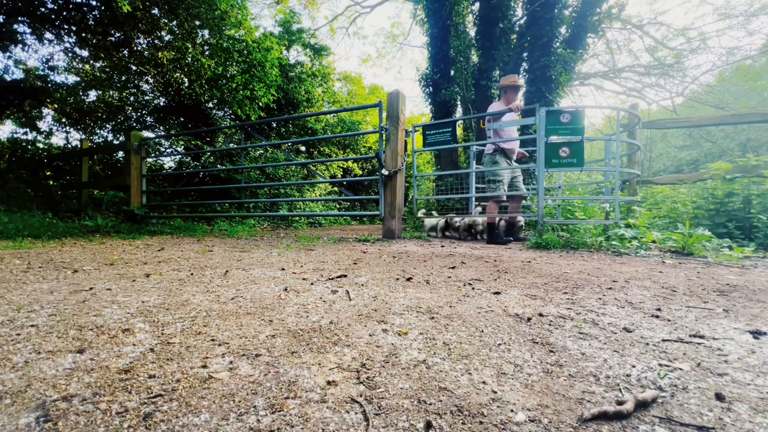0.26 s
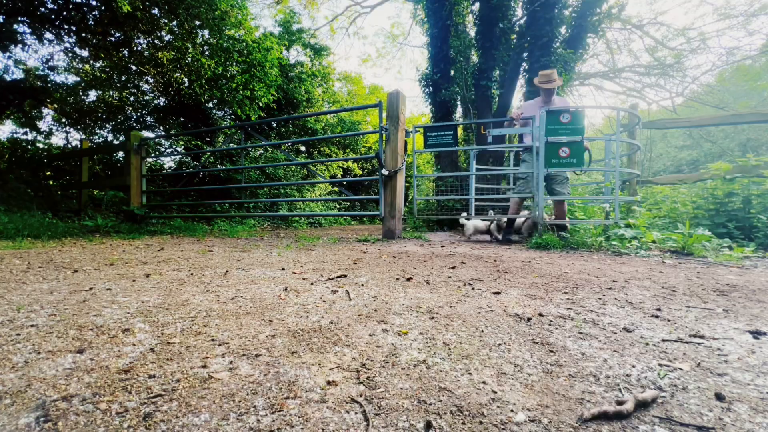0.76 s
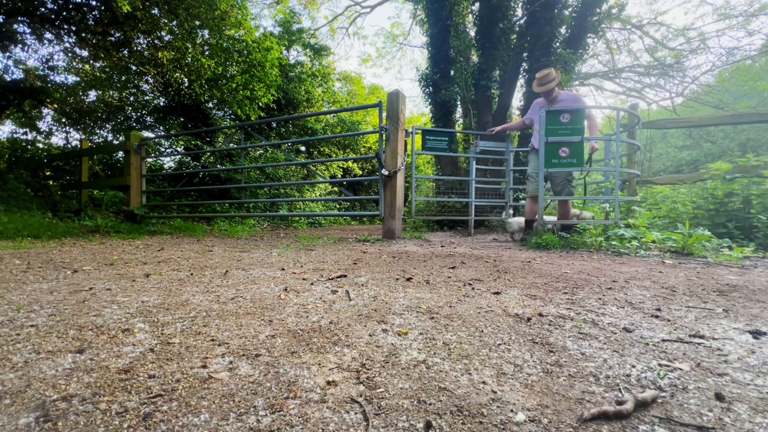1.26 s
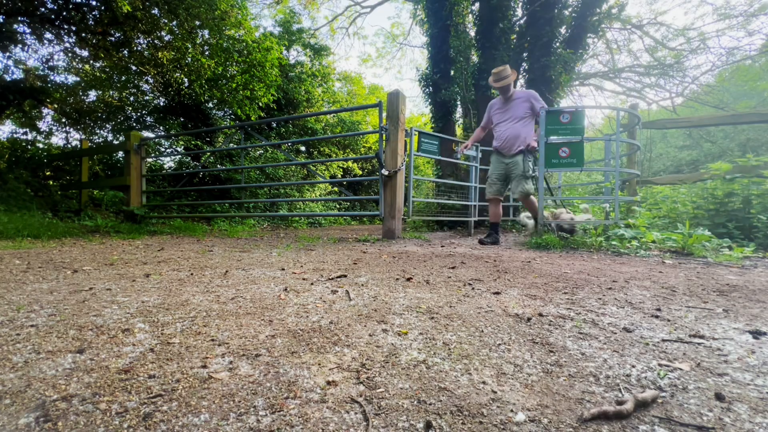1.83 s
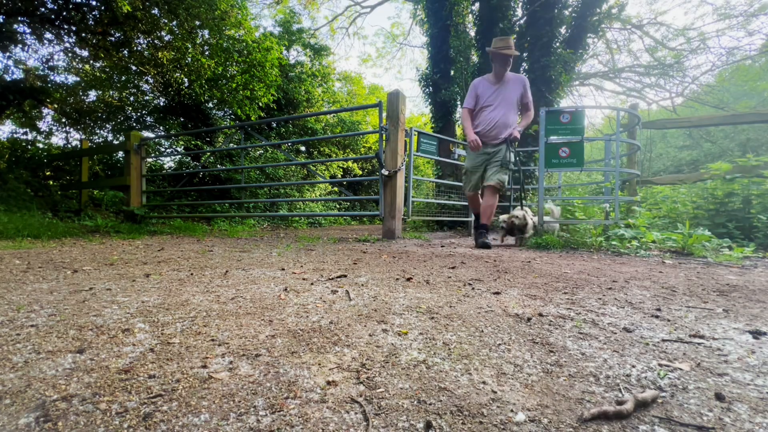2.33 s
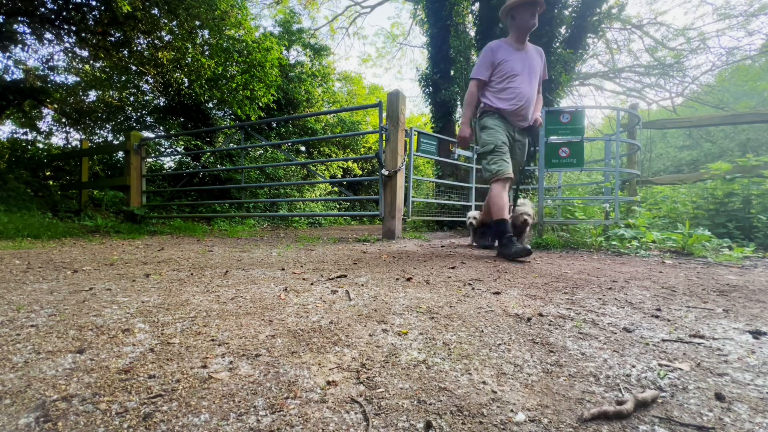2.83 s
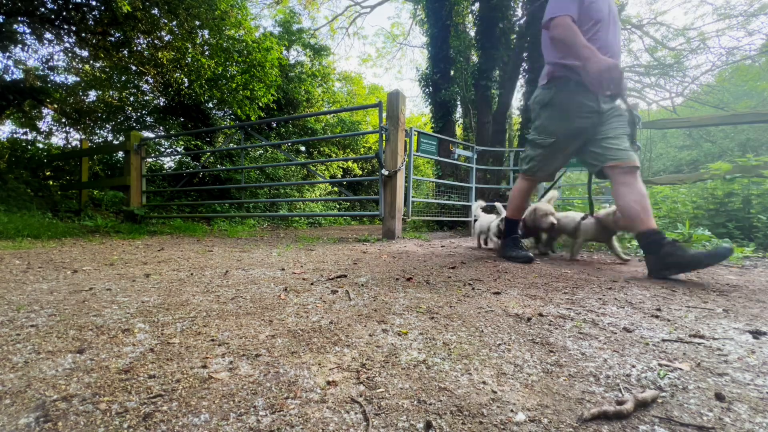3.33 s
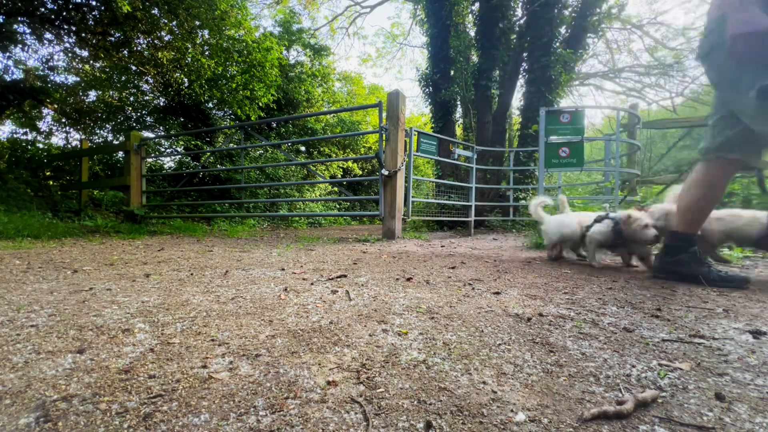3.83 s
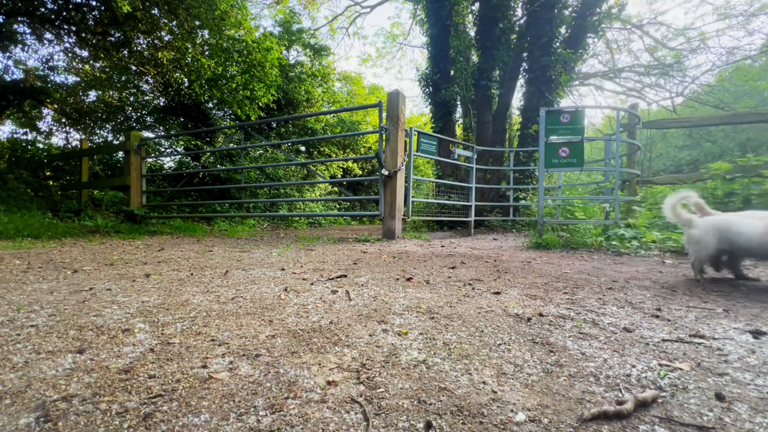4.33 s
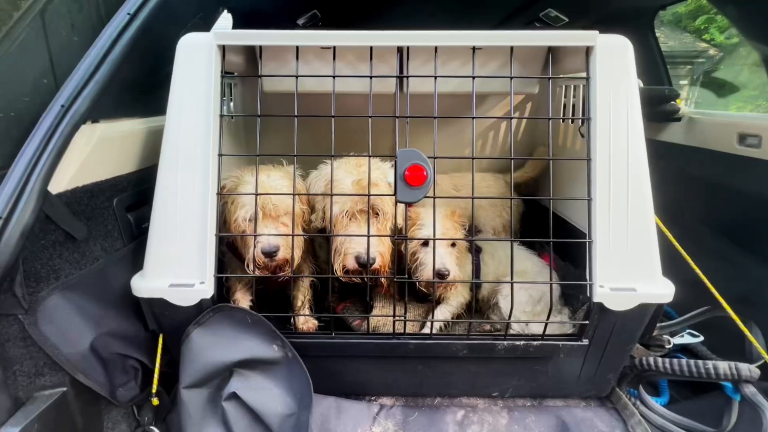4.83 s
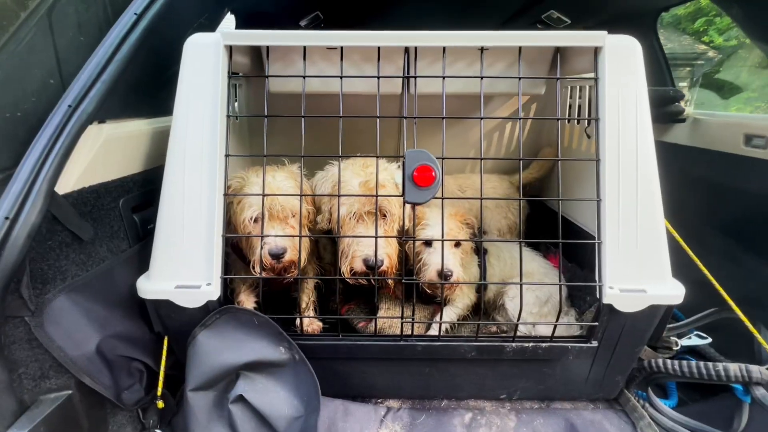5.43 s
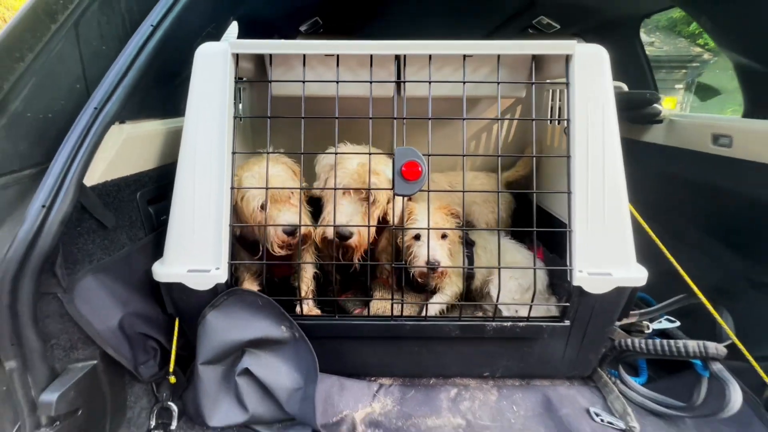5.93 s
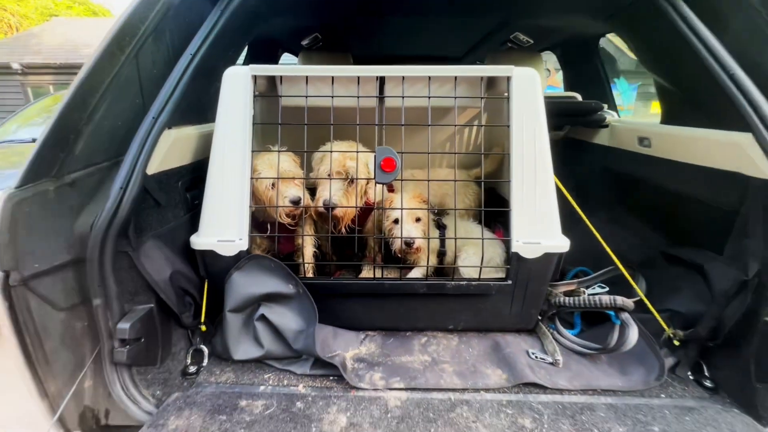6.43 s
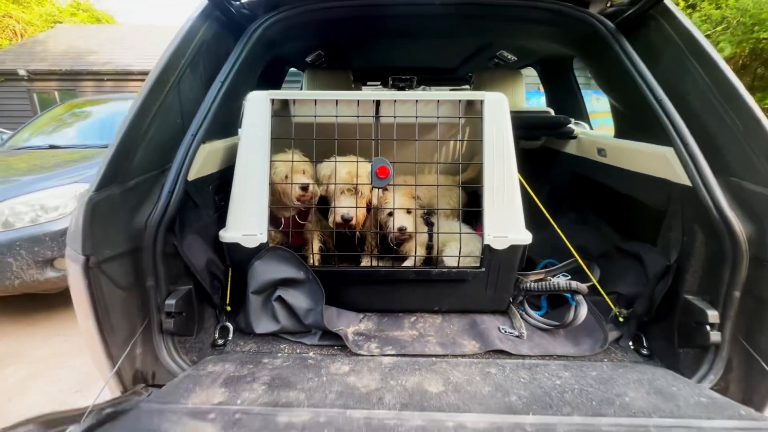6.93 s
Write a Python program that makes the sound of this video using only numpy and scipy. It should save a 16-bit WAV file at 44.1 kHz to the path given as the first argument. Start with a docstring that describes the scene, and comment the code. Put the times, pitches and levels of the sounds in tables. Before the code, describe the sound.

A quiet wooded path, heard in stereo: soft traffic rumble, leaf hiss and small high bird notes with hazy echoes. Dry grit snaps under boots at 0.1 and in a cluster around 0.6-0.7 seconds. Faint metal ticks from a latch come at 1.2 and 1.5. From 1.84 to 2.05 a tubular steel gate slams in a rapid, bright, rattling clang with a dull frame thud, by far the loudest event; it bounces once at 2.2, then dies quickly among the trees. Birds answer, and grit snaps, scuffs and faint paw taps run from 2.8 to 4. After 4.65, beside an open car, sparse birds and a very thin high whistle until 5.6, with small knocks and scuffs. Wind buffets the microphone from 5.65, strongest at 6.15 and 6.8. Traffic rush grows while a faint engine whine rises from 5.9, drops at 6.6 and rises again. A short hollow panel knock falls at 7.05.

```python
"""Grit snaps under boots and birds sing among echoing trees, over far traffic, wind and leaves.
A latch then ticks and a tubular steel gate slams, rattles and bounces once: short contacts ring its modes.
Grit and paws are filtered noise bursts; bird notes and a thin whistle are gliding sines.
Later, beside an open car, a hollow panel is knocked, wind buffets the microphone (swelling low noise),
and an engine pulls away as two rising whines."""
import sys
import numpy as np
from scipy import signal
from scipy.fft import rfft, irfft
from scipy.io import wavfile

SR = 44100
rng = np.random.default_rng(int(sys.argv[2]) if len(sys.argv) > 2 else 0)


def transcribe(u):
    """Save the signal u as a 16-bit wav file named by the first command-line argument.

    u: samples, shape (n,) or (channels, n), limited to [-1, 1]; the rate is SR.
    q: integer samples, one column per channel.
    """
    v = np.clip(np.atleast_2d(u).T, -1, 1)
    q = np.round(v * 32767).astype(np.int16)
    wavfile.write(sys.argv[1], SR, q)


N = 316241  # samples

# Blows of steel on steel. Each row: time in seconds, level in dB, brightness in dB per octave,
# favoured pitch in Hz.
GATE_BLOWS = [(1.207, -41.5, -2.5, 4440), (1.4845, -33, -3, 2070), (1.494, -39.5, -2, 2950),
              (1.837, -14.5, 2.5, 2020), (1.84, -13, 0, 2780), (1.853, -21.5, 5.5, 2820),
              (1.872, -28.5, -6, 2900), (1.919, -9.5, -4, 3370), (1.925, -9.5, 0.5, 3380),
              (1.936, -13, 3, 2450), (1.957, -24, 1, 2500), (1.993, -20.5, 7, 5930), (1.999, -12, -2, 2100),
              (2.017, -19, 9.5, 2880), (2.030, -9.5, -2, 2240), (2.037, -17, 3, 2540),
              (2.048, -35.5, 4.5, 2600), (2.209, -17, -3, 3340), (2.216, -20.5, 0.5, 3010),
              (2.226, -23.5, 3, 2840), (2.269, -27, -3, 2730), (2.395, -34, -4, 2660)]
# Strong modes of the gate. Each row: frequency in Hz, relative level in dB, 60 dB decay time in seconds.
GATE_MODES = [(570, -17.5, 0.085), (833, -23.5, 0.36), (1001, -21, 0.15), (1485, -16, 0.35),
              (1621, -9.5, 0.14), (1910, -16, .15), (2040, -6, 0.14), (2150, -10, 0.26), (2410, -12, 0.38),
              (2533, -12, 0.31), (2627, -9.5, 0.38), (2760, -15.5, 0.73), (2825, 0, 0.13), (2920, -10, .3),
              (3360, -9.5, 0.092), (3300, -22, 0.17), (3410, -18.5, .22), (3726, -10, 0.37),
              (4180, -11, 0.22), (4610, -4.5, 0.12), (5100, -14.5, 0.16), (5100, -14, .2),
              (6200, -16.5, 0.25), (6040, -16.5, 0.14), (6280, -16, 0.11), (6260, -16.5, 0.22),
              (7830, -7, 0.092), (8300, -17.5, 0.25), (8830, -13, 0.22), (11486, 3, 0.052)]
# Spectrum of the crowd of small bar modes. Each row: frequency in Hz, relative level in dB.
CROWD_SPECTRUM = [(35, -41), (60, -16.5), (214, -16.5), (450, 2), (1140, -1.5), (2000, 8.5), (2800, 11.5),
                  (5110, 4), (8000, 10), (9500, -17), (11800, 4.5), (13000, -15.5)]
# Decay of that crowd. Each row: frequency in Hz, 60 dB decay time in seconds.
CROWD_DECAY = [(100, 0.17), (500, 0.23), (2000, 0.15), (3000, 0.26), (6000, 0.086), (12000, 0.08)]
# Stereo width of the crowd. Each row: frequency in Hz, side level relative to mid in dB.
CROWD_WIDTH = [(60, -19), (400, -18.5), (800, -10), (1300, -9.5), (1900, -14.5), (2900, -13.5),
               (4500, -18.5), (12500, -17)]
# Grit snaps, claws and small knocks. Each row: start in seconds, level in dB, main pitch in Hz,
# thump level in dB, treble level in dB, left-right difference in dB.
GRIT_SNAPS = [(0.057, -30.5, 1440, -62, -54, 0.5), (0.269, -55, 886, -60, -29, 1),
              (0.32, -57, 842, -65, -38, 0), (0.419, -72, 802, -66, -20, 4),
              (0.537, -43, 1640, -43.5, -38, -1), (0.619, -29, 1540, -67, -56, 1.5),
              (0.632, -25.5, 1390, -41, -48, 2), (0.637, -21.5, 970, -46, -56, -3.5),
              (0.678, -33, 2250, -56, -60, 0), (0.689, -30.5, 1570, -43, -56, -2),
              (0.709, -39, 770, -48, -55, 1), (0.912, -49, 1420, -60, -62, 0),
              (0.926, -51, 1010, -53, -68, 0), (1.15, -44, 675, -39.5, -77.5, -3),
              (1.463, -39, 2060, -61, -59.5, 1), (1.624, -31, 1340, -61, -54, -2),
              (1.748, -33.5, 1290, -60, -59, -1), (2.755, -41, 1460, -48, -49, -1),
              (2.785, -22, 2250, -41.5, -28, -2.5), (2.815, -26, 1620, -57, -55, -1),
              (2.866, -29, 1084, -52, -55, 0), (3.107, -38.5, 2460, -65, -41, 5),
              (3.217, -48.5, 1330, -66, -31, 3), (3.319, -33, 2200, -46.5, -72, 5),
              (3.352, -46, 834, -48, -31, -3), (3.393, -34.5, 1500, -63, -46, 5),
              (3.412, -26.5, 2480, -69, -56, 2.5), (3.489, -38, 835, -52, -32.5, -4.5),
              (3.536, -36.5, 910, -68, -42, -6), (3.554, -30, 1670, -70, -39, 3),
              (3.59, -64, 1174, -52, -25, 3), (3.717, -56, 703, -64, -35, -1),
              (3.857, -39.5, 1480, -70, -25.5, 3), (3.871, -40, 2500, -50, -22.5, -7),
              (3.919, -26, 1780, -52, -41, 2), (3.94, -32, 2030, -64, -51, 0),
              (4.007, -45, 1646, -43, -31.5, 6), (4.405, -51, 1240, -43.5, -53, 13),
              (4.548, -51, 813, -48.5, -30, 5), (4.897, -68, 870, -53.5, -44, 14),
              (5.248, -36.5, 2530, -42, -60, 5), (5.284, -32, 784, -33, -33, -6),
              (5.298, -44, 720, -48, -63, 17), (5.386, -49, 760, -45, -51, -4),
              (5.462, -43.5, 1475, -83.5, -67, -3.5), (5.567, -29.5, 1580, -41, -26, -2.5),
              (5.611, -34, 1045, -35, -37, -5.5), (5.761, -42, 705, -31.5, -60, 3),
              (5.79, -39, 848, -59, -31.5, -3), (5.883, -55, 894, -40.5, -41, -3.5),
              (6.222, -54, 700, -25.5, -73.5, -4), (6.355, -38.5, 1170, -46, -70, 1.5),
              (6.406, -40, 1480, -54, -62, -1), (6.62, -46, 1150, -33, -46, -4),
              (6.646, -30.5, 886, -35, -34, 8), (6.697, -27.5, 704, -47, -65, -1)]
# Scuffing soles and paws. Each row: time of the peak in seconds, level in dB, time to swell by 20 dB
# in seconds, time to fade by 20 dB in seconds, treble relative to that level in dB.
SCUFF_STROKES = [(.06, -57.5, 0.11, 0.17, -13), (.64, -44.5, 0.081, 0.095, -24),
                 (1.156, -61, 0.026, 0.055, -39), (1.214, -56.5, 0.023, .15, -18),
                 (2.872, -48.5, 0.1, 0.065, -16), (3.42, -52.5, 0.33, 0.062, -16),
                 (3.556, -58, 0.0087, 0.01, -15), (3.922, -49, 0.032, .1, -7.5),
                 (4.404, -54.5, 0.015, 0.28, -5.5), (4.914, -63, 0.037, 0.01, 14),
                 (5.25, -54, 0.013, 0.033, 4.5), (5.294, -45, 0.048, 0.0092, -30),
                 (5.563, -43, 0.0071, 0.045, -4), (5.812, -47, 0.052, 0.093, -6.5),
                 (6.62, -45, 0.021, 0.091, -17)]
# Faint random paw taps. The row: start in seconds, end in seconds, taps per second, relative level in dB.
PAW_TAPS = (1.5, 3.5, 11.5, -54)
# Bird notes. Each row: start in seconds, length in seconds, first, middle and last pitch in Hz, level in dB.
BIRD_NOTES = [(.0, 0.072, 7950, 8120, 7100, -65), (0.061, 0.043, 8500, 7940, 7400, -60.5),
              (.175, 0.011, 4200, 6300, 7440, -57), (0.187, 0.025, 7520, 7740, 6670, -51.5),
              (0.339, 0.022, 4280, 5650, 6800, -58), (0.351, 0.04, 6840, 6870, 7060, -53.5),
              (0.436, 0.031, 4980, 5380, 5050, -53), (0.544, 0.052, 6600, 7500, 6670, -57.5),
              (.62, 0.054, 4870, 5230, 5200, -62.5), (0.633, 0.052, 5330, 6060, 6280, -59),
              (0.738, 0.034, 4180, 4600, 4480, -57), (0.799, 0.017, 3620, 3630, 3700, -62),
              (0.849, 0.064, 3200, 3710, 3600, -63.5), (0.914, 0.21, 3750, 3770, 3670, -67.5),
              (0.958, 0.083, 3280, 3505, 3360, -67), (1.289, 0.039, 3030, 3690, 3730, -49),
              (1.331, 0.023, 3440, 3060, 2480, -55), (1.475, 0.027, 3130, 3610, 4000, -43.5),
              (1.672, 0.028, 3920, 3550, 2460, -48.5), (1.628, 0.026, 4430, 5160, 4940, -60),
              (1.78, 0.062, 4400, 4450, 4900, -53), (1.753, 0.022, 3380, 3740, 3350, -51),
              (2.388, 0.12, 4110, 4505, 4420, -57), (2.416, 0.038, 3220, 3600, 3870, -48),
              (2.47, 0.033, 4400, 4660, 5300, -56.5), (2.554, 0.013, 6510, 5720, 5460, -53.5),
              (2.577, 0.044, 5190, 5350, 5440, -55), (2.581, 0.023, 5360, 4660, 3740, -49.5),
              (2.775, 0.058, 6090, 4770, 4140, -54), (2.823, 0.11, 3530, 4010, 4060, -53),
              (3.123, 0.034, 6450, 5710, 4770, -57.5), (3.14, 0.058, 4870, 4830, 4710, -53.5),
              (3.183, 0.067, 4730, 4160, 3960, -51.5), (3.694, 0.039, 2813, 3210, 3630, -57),
              (3.724, 0.024, 2880, 3210, 3050, -59.5), (3.844, 0.051, 2885, 3120, 3084, -62),
              (4.042, 0.024, 2805, 2930, 3150, -55), (4.072, 0.022, 2850, 3010, 2960, -59),
              (4.234, 0.037, 2570, 2916, 3165, -57), (4.258, 0.029, 2710, 3030, 2920, -58.5),
              (4.44, 0.0255, 2440, 2904, 3180, -56), (4.465, 0.03, 2590, 2710, 2690, -68),
              (4.659, 0.12, 3574, 3475, 3370, -70.5), (4.666, 0.091, 3950, 3960, 3940, -69.5),
              (4.719, 0.016, 6840, 7660, 8000, -77), (4.733, 0.027, 6670, 5180, 4760, -72),
              (4.831, 0.088, 3990, 3480, 3350, -68.5), (4.891, 0.11, 7500, 7140, 6670, -68),
              (4.945, 0.072, 3340, 3220, 3160, -72), (5.033, 0.054, 3930, 3440, 4140, -66),
              (5.123, 0.042, 3620, 3400, 3160, -65.5), (5.207, 0.065, 3324, 3440, 3550, -65.5),
              (5.621, 0.033, 4090, 3680, 3590, -50.5), (5.689, 0.012, 3440, 3390, 3580, -62),
              (5.729, 0.015, 3670, 3680, 3720, -49), (5.752, 0.015, 4040, 4200, 3920, -61),
              (5.828, 0.036, 3270, 3550, 3690, -58), (5.902, 0.042, 3960, 3675, 3830, -63),
              (5.95, 0.039, 3990, 3880, 3740, -64), (6.07, 0.044, 3860, 4050, 3950, -74.5),
              (6.116, 0.029, 2180, 2453, 2430, -57.5)]
# Thin whistle. The row: start in seconds, end in seconds, first pitch in Hz, last pitch in Hz, level in dB.
WHISTLE_TONE = (4.735, 5.58, 8090, 7850, -68)
# Modes of the knocked panel. Each row: frequency in Hz, relative level in dB, 60 dB decay time in seconds.
PANEL_MODES = [(570, -12.5, 0.058), (847, -5, 0.05), (1030, 0, 0.026), (1245, -6, 0.035), (1920, -12, 0.01),
               (2650, -15, 0.011)]
# Engine whine, one list for each gear. Each row: time in seconds, pitch in Hz, level in dB.
ENGINE_GEARS = [
    [(5.88, 295, -42), (5.95, 300, -46.5), (6.15, 345, -50), (6.3, 410, -46), (6.5, 500, -48),
     (6.58, 530, -53)],
    [(6.62, 280, -48), (6.75, 330, -50.5), (6.95, 450, -51), (7.1, 560, -43.5), (7.17, 600, -56)],
]
# Wind buffets. Each row: time of the peak in seconds, level in dB.
WIND_GUSTS = [(5.651, -33.5), (5.76, -40.5), (6.0, -34), (6.161, -26), (6.4, -43), (6.778, -26),
              (6.94, -43)]
# Background levels. Each row: time in seconds, then wind and traffic rumble, traffic rush, leaf hiss
# and finer leaf hiss, all in dB.
AIR_LEVELS = [(0, -55, -59, -59.5, -84), (.3, -55, -58.5, -66.5, -63), (.63, -57.5, -58, -57, -53),
              (1.0, -60, -60, -68, -68.5), (1.78, -54.5, -54, -59.5, -62.5), (2.5, -56, -52, -58, -69),
              (2.82, -52, -56.5, -50, -55), (2.95, -59.5, -55, -64, -62), (3.2, -52.5, -57, -60.5, -61),
              (3.5, -58.5, -57, -63.5, -66.5), (3.9, -51, -57.5, -60.5, -60.5),
              (4.15, -58, -58, -69.5, -68.5), (4.6, -53.5, -57, -71.5, -73.5), (5.15, -52.5, -58, -88, -74),
              (5.55, -64, -50.5, -61.5, -64.5), (6.2, -47.5, -46.5, -54.5, -68.5),
              (6.75, -40.5, -44, -48.5, -53), (7.17, -54.5, -41, -47.5, -52.5)]
# Colour of the wind and traffic rumble. Each row: frequency in Hz, relative level in dB.
RUMBLE_SPECTRUM = [(12, -34.5), (20, -17), (49, 5.5), (70, 9.5), (88, 2), (162, -19.5), (200, -32.5),
                   (260, -40), (440, -120)]
# Colour of the traffic rush. Each row: frequency in Hz, relative level in dB.
RUSH_SPECTRUM = [(59, -33.5), (100, 3.5), (267, -5), (306, -2), (390, -0.5), (446, -4.5), (775, -12.5),
                 (1360, -24), (2500, -46.5), (3250, -54), (5500, -120)]
# Colour of the leaf hiss. Each row: frequency in Hz, relative level in dB.
HISS_SPECTRUM = [(530, -19.5), (900, 2.5), (1370, -0.5), (1800, -1), (3490, -6), (8230, -14), (9500, -29.5),
                 (12000, -16.5), (14000, -38)]
# Stereo width of the background. Each row: frequency in Hz, side level relative to mid in dB.
AIR_WIDTH = [(60, -25), (150, -16), (360, -10), (870, -3.5), (1400, -8.5), (2000, -34), (12500, -32.5)]

CONTACT_S, THUD_S = 0.0025, 0.011  # rise times of the contact and of the frame's answer
THUD_DB, THUD_FROM_S, FIRST_THUD_DB = -5, 1.9, -17.5  # the frame thuds fully once it meets the post
SNAP_T60_S, SNAP_SPREAD = 0.012, 1.7  # spread: band edges as a factor of the main pitch
CAR_FROM_S = 4.65  # from here birds are heard by the car
KNOCK_S, KNOCK_DB, KNOCK_PAN_DB = 7.0455, -18, -3
GUST_FALL_DB_PER_S = 308  # on both sides of the peak
WOODS_SIDE_DB = -21.5


def from_db(db):
    """A level in decibels is twenty times the decimal logarithm of an amplitude ratio."""
    return 10 ** (np.asarray(db) / 20)


def rms_one(x):
    """Division by the root mean square sets the effective amplitude to 1."""
    return x / np.sqrt(np.mean(x ** 2) + 1e-20)


def in_time(rows, outside=None):
    """Linear interpolation turns timed rows into one curve per column."""
    s, *columns = np.transpose(rows)
    return [np.interp(np.arange(N) / SR, s, c, outside, outside) for c in columns]


def at_hz(points, hz):
    """Interpolation on a logarithmic frequency axis treats equal intervals alike."""
    frequencies, values = np.array(points).T
    return np.interp(np.log(hz), np.log(frequencies), values)


def band(x, low_hz, high_hz):
    """A Butterworth band-pass has a maximally flat response between its edges."""
    edges = [low_hz, min(high_hz, .45 * SR)]
    return signal.sosfilt(signal.butter(2, edges, "band", fs=SR, output="sos"), x)


def stereo(mid, side):
    """Sum and difference of mid and side give left and right."""
    return np.array([mid + side, mid - side])


def add(out, s, x):
    """Superposition: x is added to out from time s."""
    i = round(s * SR)
    out[..., i:i + x.shape[-1]] += x[..., :N - i]


def drift(rate):
    """Low-passed noise, with its corner at rate in Hz, gives a random modulation of rms 1."""
    r = np.exp(-80 * np.pi * rate / SR)  # one value every 40 samples
    slow = signal.lfilter([1], [1, -2 * r, r * r], rng.standard_normal(N // 40 + 2002))
    slow = slow[2000:]  # leave out the filter's start
    return np.interp(np.arange(N) / 40, np.arange(len(slow)), rms_one(slow))


def ring(x, hz, t60):
    """A damped resonator: a unit impulse starts a decaying sine of height 1."""
    r, w = from_db(-60 / (t60 * SR)), 2 * np.pi * hz / SR
    return signal.lfilter([0, np.sin(w)], [1, -2 * r * np.cos(w), r * r], x + 1e-18)


def peaked(s, db, swell, fade):
    """An exponential envelope climbs 20 dB in time swell up to s, then drops 20 dB in time fade."""
    t = np.arange(N) / SR - s
    return from_db(db - 20 * np.maximum(-t / max(swell, .003), t / max(fade, .003)))


def coloured(spectrum, patchy_db):
    """Spectral shaping of white noise gives stereo noise of rms 1, slowly modulated in level."""
    hz = np.maximum(np.fft.rfftfreq(N, 1 / SR), 1)
    mid, side = rfft(rng.standard_normal((2, N))) * from_db(at_hz(spectrum, hz))
    both = stereo(irfft(mid, N), irfft(side * from_db(at_hz(AIR_WIDTH, hz)), N))
    return rms_one(both * from_db(patchy_db * drift(6.5)))


def gate(modes_db=-13.5, crowd_db=-8, crack_db=-4):
    """Modal excitation: each short grinding contact strikes the strong modes and feeds a crowd of small ones."""
    out, heard = np.zeros((2, N)), 3 * SR  # the ringing has died by then
    t = np.arange(SR // 20) / SR
    strikes = rng.normal(0, 3.0, (len(GATE_BLOWS), len(GATE_MODES)))
    contacts = rng.standard_normal((len(GATE_BLOWS), len(t)))
    power = np.zeros((len(GATE_BLOWS), heard))
    for (s, db, *_), noise, row in zip(GATE_BLOWS, contacts, power):
        start = s - CONTACT_S  # pressure peaks at the time of the blow
        thud_db = THUD_DB if s > THUD_FROM_S else FIRST_THUD_DB
        shape = t / CONTACT_S * np.exp(1 - t / CONTACT_S)
        add(row, start, from_db(2 * db) * shape / np.sum(shape))
        add(out, start, from_db(db + crack_db) * band(noise * shape, 2200, 5500))
        slow = t / THUD_S * np.exp(1 - t / THUD_S)  # the frame answers later and longer
        add(out, start, from_db(db + thud_db) * band(noise * slow, 80, 650))

    s, db, bright_db, favoured_hz = np.transpose(GATE_BLOWS)
    for (hz, level_db, t60), luck_db in zip(GATE_MODES, strikes.T):
        # the spot that is struck drives the modes near one pitch hardest
        spot_db = 11 * np.exp(-(np.log2(hz / favoured_hz) / .12) ** 2)
        tilt_db = bright_db * np.log2(hz / 2800)
        height = from_db(db + level_db + modes_db + luck_db + spot_db + tilt_db)
        push = np.zeros(heard)
        push[(s * SR).astype(int)] = rng.choice([-1, 1], len(s)) * height
        twin = ring(push, hz * rng.uniform(1.006, 1.016), 0.43 * t60)  # twin bars beat
        out[:, :heard] += ring(push, hz, t60) + 0.95 * twin

    edges, white = 60 * 2 ** np.arange(0, 8, 1 / 4), rng.standard_normal((2, 2, heard))
    for k, (low, high) in enumerate(zip(edges, edges[1:])):
        hz = np.sqrt(low * high)
        fed = from_db(2 * bright_db * np.log2(hz / 2800)) @ power
        kept = from_db(-120 / (at_hz(CROWD_DECAY, hz) * SR))  # energy drains away
        stored = signal.lfilter([1], [1, -kept], fed + 1e-18)
        level = from_db(at_hz(CROWD_SPECTRUM, hz) + crowd_db) * np.sqrt(stored)
        mid, side = level * band(white[k % 2], low, high)
        out[:, :heard] += stereo(mid, side * from_db(at_hz(CROWD_WIDTH, hz)))
    return out


def snaps(tail_db=-17):
    """Impulsive fracture: a crack with a short tail around its own pitch, with a dull thump and bright tick."""
    out, t = np.zeros((2, N)), np.arange(SR // 10) / SR
    noises = rng.standard_normal((len(GRIT_SNAPS), len(t)))
    for (s, db, hz, thump_db, treble_db, pan_db), noise in zip(GRIT_SNAPS, noises):
        burst = noise * (from_db(-60 * t / SNAP_T60_S) + from_db(tail_db - 60 * t / 0.063))
        burst[0] = 6.9  # the grain gives way at once
        body = band(burst, hz / SNAP_SPREAD, hz * SNAP_SPREAD)
        thump = band(noise * from_db(-60 * t / 0.12), 130, 540)
        tick = band(burst, 7300, 15000)
        parts = ((db, body), (thump_db, thump), (treble_db, tick))
        hit = sum(from_db(level) * part / np.abs(part).max() for level, part in parts)
        add(out, s, hit * from_db([[pan_db / 2], [-pan_db / 2]]))
    return out


def scuffs(per_s=2500, uneven_db=4.0):
    """Granular friction: grit grains crack at random under the moving sole."""
    sizes = from_db(uneven_db * np.minimum(rng.exponential(1, N), 5))
    grains = sizes * rng.choice([-1, 1], N) * (rng.random(N) < per_s / SR)
    crunch, fizz = rms_one(band(grains, 220, 3500)), rms_one(band(grains, 2000, 10000))
    return sum(peaked(*stroke) * (crunch + from_db(treble_db) * fizz) for *stroke, treble_db in SCUFF_STROKES)


def patter(t60=0.0093, uneven_db=4.):
    """Random impacts: claws and grit tap lightly, each tap a short decaying burst of broad noise."""
    start, end, per_s, db = PAW_TAPS
    t = np.arange(N) / SR
    chosen = (rng.random(N) < per_s / SR) * (t > start) * (t < end)
    taps = chosen * from_db(db + uneven_db * rng.standard_normal(N))
    shape = signal.lfilter([1], [1, -from_db(-60 / (t60 * SR))], taps + 1e-18)
    return 3.8 * band(shape * rng.standard_normal(N), 700, 4100)


def birds(notes, waver, flutter_db):
    """Frequency modulation: whistled notes glide through three pitches as pitch and level flutter."""
    out, wobble, flutter = np.zeros(N), drift(160.0), drift(50.0)
    for s, length, *hz, db in notes:
        u = np.linspace(0, 1, round(length * SR))
        pitch = np.interp(u, [0, .5, 1], hz) * (1 + waver * wobble[round(s * SR):][:len(u)])
        swell = np.sqrt(2) * np.sin(np.pi * u) ** .5
        add(out, s, from_db(db) * swell * np.sin(2 * np.pi * np.cumsum(pitch) / SR))
    return out * from_db(flutter_db * flutter)


def whistle(waver=0.0018, flutter_db=2.5):
    """Phase is the integral of frequency: a thin sine sags in pitch while its level flutters."""
    start, end, first_hz, last_hz, db = WHISTLE_TONE
    pitch, = in_time([(start, first_hz), (end, last_hz)])
    edges = [(start, db - 9.5), (start + .02, db), (end - .02, db), (end, db - 20)]
    level_db, = in_time(edges, outside=-130)
    level = from_db(level_db + flutter_db * drift(30.))
    return level * np.sin(2 * np.pi * np.cumsum(pitch * (1 + waver * drift(29.0))) / SR)


def knock():
    """Impulse response: one soft click sets the modes of a small hollow panel ringing."""
    click = np.zeros(N)
    click[round(KNOCK_S * SR)] = from_db(KNOCK_DB)
    click = np.convolve(click, np.hanning(16) / 7.5)[:N]  # a soft contact
    panel = sum(from_db(db) * ring(click, hz, t60) for hz, db, t60 in PANEL_MODES)
    return panel * from_db([[KNOCK_PAN_DB / 2], [-KNOCK_PAN_DB / 2]])


def engine(upper_db=-12, top_db=-17):
    """Additive synthesis: a fluttering whine follows each gear with partials at 1, 1.5 and 2.5 times its pitch."""
    out = np.zeros(N)
    for gear in ENGINE_GEARS:
        phase = 2 * np.pi * np.cumsum(in_time(gear)[0] * (1 + 0.0071 * drift(5.9))) / SR
        tone = np.sin(phase) + from_db(upper_db) * np.sin(1.5 * phase) + from_db(top_db) * np.sin(2.5 * phase)
        out += from_db(in_time(gear, outside=-120)[1] + 2.0 * drift(23)) * tone
    return out


def wind_and_rumble(level_db):
    """Turbulence: low noise holds the wind and traffic rumble, and buffets swell it briefly."""
    slope_s = 20 / GUST_FALL_DB_PER_S
    gusts = sum(peaked(s, db, slope_s, slope_s) for s, db in WIND_GUSTS)
    return (from_db(level_db) + gusts) * coloured(RUMBLE_SPECTRUM, patchy_db=3.5)


def traffic_rush(level_db):
    """Many distant sources add up to noise, here coloured and slowly varied."""
    return from_db(level_db) * coloured(RUSH_SPECTRUM, patchy_db=1.36)


def leaves(hiss_db, fine_hiss_db):
    """Band filtering splits one leaf hiss into a coarse and a finer part with levels of their own."""
    hiss = coloured(HISS_SPECTRUM, patchy_db=3.0)
    coarse, fine = rms_one(band(hiss, 330, 3800)), rms_one(band(hiss, 2400, 14000))
    return from_db(hiss_db) * coarse + from_db(fine_hiss_db) * fine


def woods_echo(x, wet_db, t60, lumpy_db=3.5):
    """Multiple scattering: trunks return a dying, lumpy haze of echoes; only its lower part spreads wide."""
    t = np.arange(SR * 2 // 3) / SR
    lumps = np.interp(t, np.arange(61) / 60, rng.standard_normal(61))
    envelope = from_db(lumpy_db * lumps - 60 * t / t60) * np.minimum(t / 0.0035, 1)
    haze = rng.standard_normal((2, len(t))) * envelope
    haze /= np.sqrt(np.sum(haze[0] ** 2))
    mid, side = signal.fftconvolve(x[None], haze, axes=1)[:, :N]
    return from_db(wet_db) * stereo(mid, from_db(WOODS_SIDE_DB) * band(side, 100, 4200))


def scene():
    """Superposition: direct sounds and their echoes among the trees add to the background."""
    steel = gate()
    clang = steel + woods_echo(steel.mean(axis=0), wet_db=-6.5, t60=0.59)
    hits, brushing = snaps() + knock(), scuffs() + patter()
    ground = hits + woods_echo(hits.mean(axis=0), wet_db=-13.5, t60=0.092)
    ground += brushing + woods_echo(brushing, wet_db=-9.5, t60=0.29)
    far_birds = birds([n for n in BIRD_NOTES if n[0] < CAR_FROM_S], waver=.02, flutter_db=2.5)
    far = far_birds + woods_echo(far_birds, wet_db=4, t60=0.57)
    car_birds = birds([n for n in BIRD_NOTES if n[0] >= CAR_FROM_S], waver=0.0072, flutter_db=3.5)
    tones = car_birds + whistle()
    by_car = tones + woods_echo(tones, wet_db=2.5, t60=0.48)
    rumble_db, rush_db, hiss_db, fine_hiss_db = in_time(AIR_LEVELS)
    air = wind_and_rumble(rumble_db) + traffic_rush(rush_db) + leaves(hiss_db, fine_hiss_db)
    return clang + ground + far + by_car + engine() + air


def record(dry, top_db=-10, apart_db=-10):
    """Saturation rounds peaks; the sum loses its treble between 9 and 11.2 kHz, while a late copy of 8.3-12 kHz
    sounds in the difference."""
    left, right = .8 * np.tanh(dry / .8)
    mid, side = (left + right) / 2, (left - right) / 2
    low_pass = signal.ellip(8, .5, 60, 9000, fs=SR, output="sos")
    high_pass = signal.ellip(8, .5, 60, 11200, "high", fs=SR, output="sos")
    treble_band = signal.ellip(4, .5, 50, (8300, 12000), "band", fs=SR, output="sos")
    below = signal.sosfilt(low_pass, [mid, side])
    above = signal.sosfilt(high_pass, mid)
    apart = signal.sosfilt(treble_band, np.roll(mid, 30))  # 30 samples late
    both = stereo(below[0] + from_db(top_db) * above, below[1] + from_db(apart_db) * apart)
    # 80 dB down from 13 kHz upward
    return signal.sosfilt(signal.cheby2(14, 80, 13000, fs=SR, output="sos"), both)


dry = scene()
out = record(dry)
transcribe(out)
```